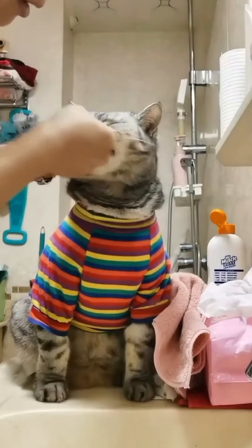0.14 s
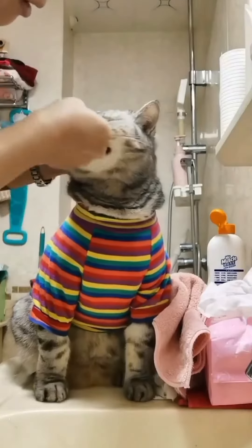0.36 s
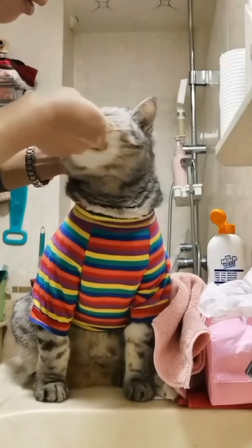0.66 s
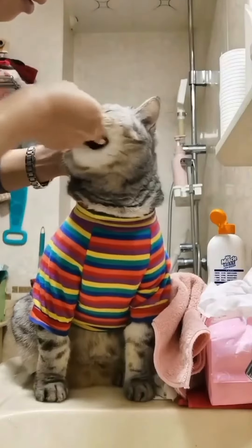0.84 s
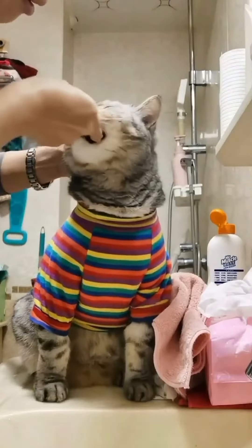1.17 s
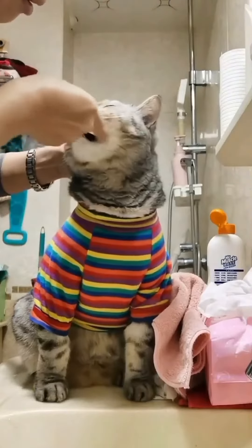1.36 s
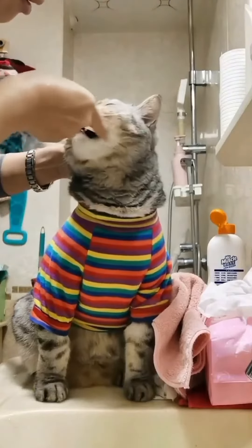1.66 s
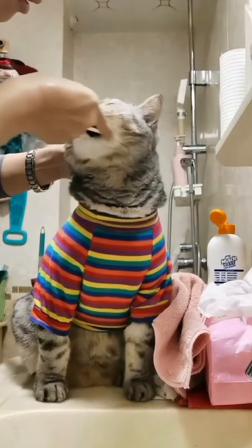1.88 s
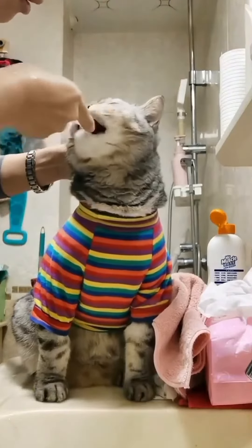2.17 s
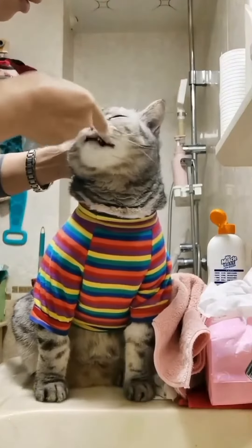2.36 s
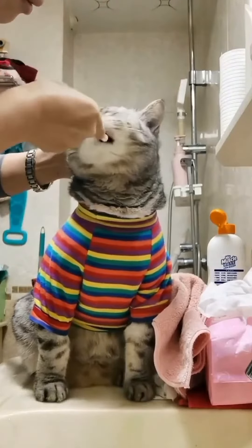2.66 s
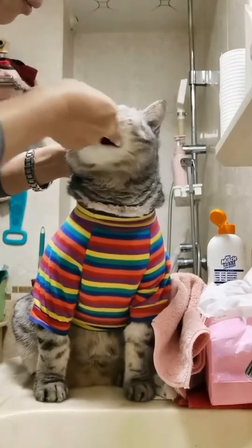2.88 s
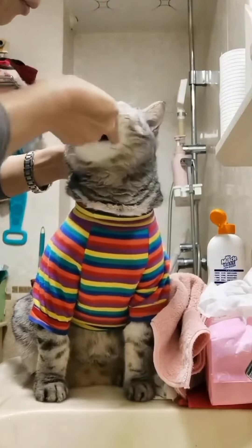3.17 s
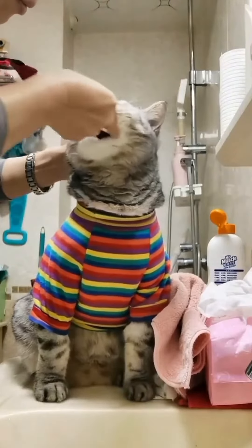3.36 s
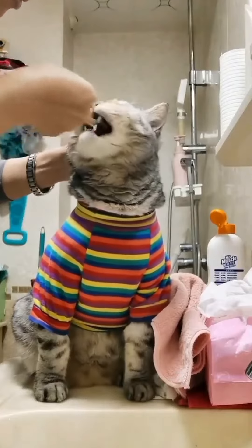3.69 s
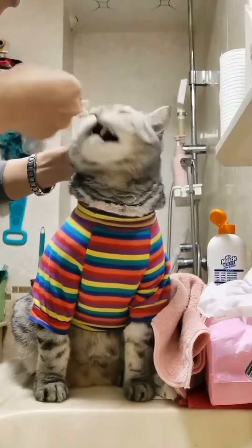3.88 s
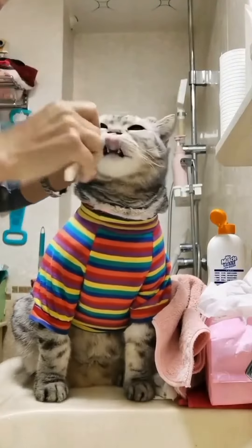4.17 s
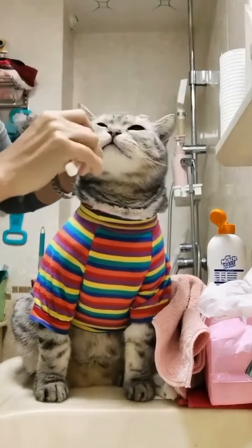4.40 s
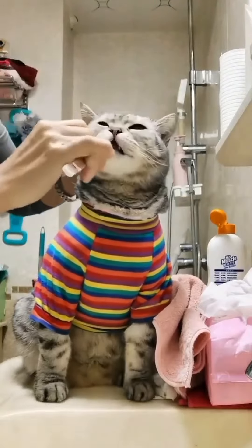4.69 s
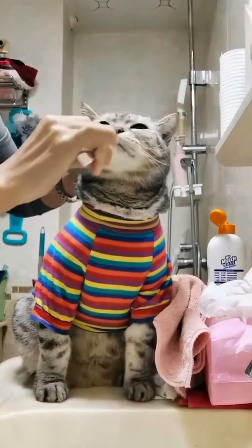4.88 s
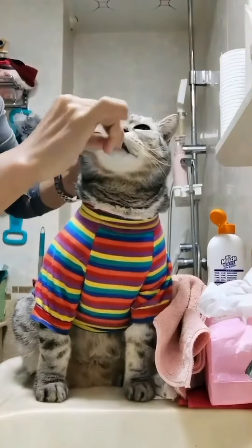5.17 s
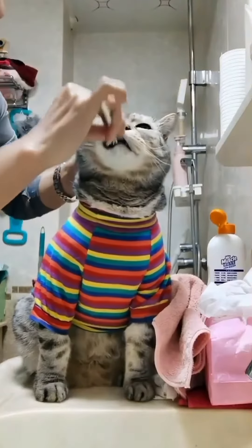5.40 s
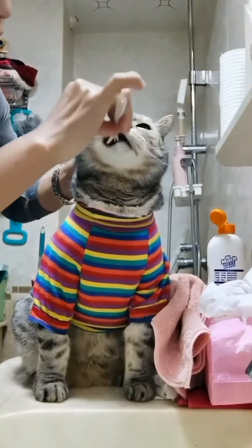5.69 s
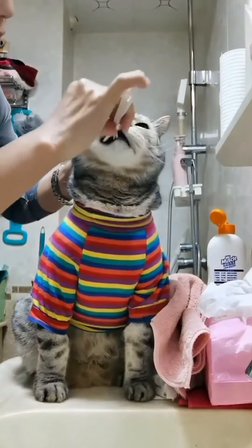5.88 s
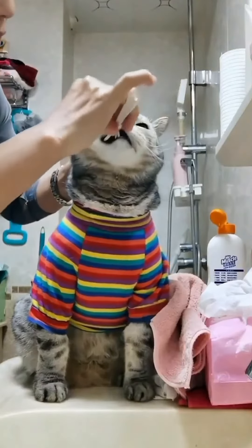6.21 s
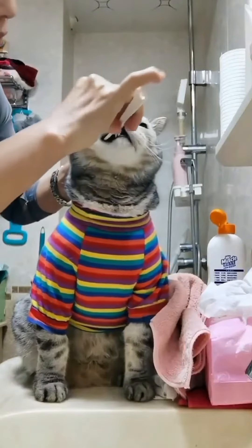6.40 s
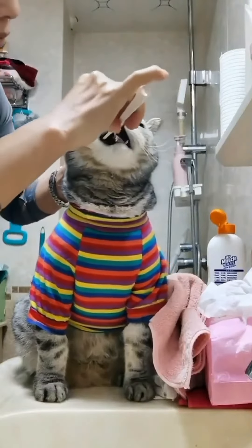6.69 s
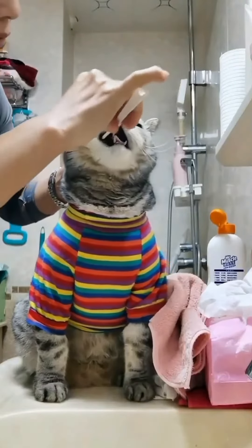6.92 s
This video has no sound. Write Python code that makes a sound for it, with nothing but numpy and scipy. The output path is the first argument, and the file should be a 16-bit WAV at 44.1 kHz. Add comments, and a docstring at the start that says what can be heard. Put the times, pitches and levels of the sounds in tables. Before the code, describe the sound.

Quick scratchy toothbrush strokes in three bursts with sharp hollow clicks, in a small tiled bathroom over faint low hum, ending with soft bumps and rustling.

```python
"""Brush strokes over a cat's teeth, in a small tiled bathroom, close to a phone: quick bursts of bristle flicks ring
the mouth cavity. Now and then a tuft snaps off a tooth, with a crack, a ring, bursting saliva and sometimes a spit.
Fur and sleeves rustle as filtered grains, and the restless cat bumps softly as decaying low sines with padding.
Reflections from the tiles follow; beneath lie a wavering sine hum, a faint drone and filtered room noise."""
import sys
import numpy as np
from scipy import signal
from scipy.fft import rfft, irfft, next_fast_len
from scipy.io import wavfile
from scipy.ndimage import uniform_filter1d

SR = 44100
rng = np.random.default_rng(int(sys.argv[2]) if len(sys.argv) > 2 else 0)


def put_to_file(sound):
    """Save the sound as 16-bit audio at rate SR, in the file named by the first command-line argument."""
    columns = np.atleast_2d(sound).T  # one column per channel
    safe = np.clip(columns, -1, 1)
    whole_steps = np.round(safe * 32767)
    wavfile.write(sys.argv[1], SR, whole_steps.astype(np.int16))


N = 310905
TIME = np.arange(N) / SR


def undb(db):
    """Decibels to gain."""
    return 10 ** (np.asarray(db) / 20)


def unit(x):
    """Scale to rms 1."""
    return x / np.sqrt(np.mean(x ** 2) + 1e-18)


def add(out, start_s, x):
    """Mix x into out from start_s on."""
    first = max(int(start_s * SR), 0)
    out[first:first + len(x)] += x[:max(N - first, 0)]


def colour(x, points):
    """Shape the spectrum with a causal, minimum-phase filter through (frequency [Hz], gain [dB]) points."""
    size = next_fast_len(len(x) + 8192) // 2 * 2
    hz, db = np.transpose(points)
    bin_hz = np.arange(size // 2 + 1) * SR / size
    log_gain = np.log(undb(np.interp(np.log(bin_hz + 1), np.log(hz), db)))
    # folding the cepstrum forward in time makes the filter causal
    cepstrum = irfft(log_gain)
    cepstrum[1:size // 2] *= 2
    cepstrum[size // 2 + 1:] = 0
    return irfft(rfft(x, size) * np.exp(rfft(cepstrum)))[:len(x)]


def resonate(x, hz, width_hz):
    """One resonance, gain 1 at its centre."""
    return signal.lfilter(*signal.iirpeak(hz, hz / width_hz, SR), x)


def cavity(x, hz, width_hz):
    """A steep-sided resonance at rms 1, from two peaks in series."""
    return unit(resonate(resonate(x, hz, width_hz), hz, 2 * width_hz))


def sine(hz, t):
    """A steady tone starting at phase 0."""
    return np.sin(2 * np.pi * hz * t)


def fade(t, t60):
    """Exponential decay, 60 dB down after t60 seconds."""
    return np.exp(-np.log(1000) * t / t60)


def walk(rate):
    """Smooth random wander at rms 1, with rate [Hz] new targets a second."""
    step = int(SR / rate)
    targets = rng.standard_normal(N // step + 2)
    path = np.interp(np.arange(N) / step, np.arange(len(targets)), targets)
    return unit(uniform_filter1d(path, step // 2))


def flicks(per_s, spread_db):
    """Random tiny impulses of uneven size, at rms 1 together."""
    size = rng.choice([-1, 1], N) * undb(spread_db * np.clip(rng.standard_normal(N), -2, 2))
    return unit(size * (rng.random(N) < per_s / SR))


# brush strokes over the teeth: (start [s], length [s], stroke level before trims [dB],
# mouth ring relative level before trim [dB], sizzle relative level [dB],
# lowest mouth resonance before its slide [Hz], second [Hz], third [Hz])
STROKE_TABLE = [(0.035, 0.063, -45, -2, -1, 2345, 4650, 5200),
                (0.186, 0.065, -46.5, 2.5, 2.5, 2225, 4080, 6800),
                (0.302, 0.072, -51.5, -1, -4, 2160, 4030, 7600),
                (0.416, 0.042, -49, 3, 0, 2240, 4960, 5970),
                (0.497, 0.055, -51.5, 5, -4.5, 2200, 4800, 6600),
                (0.618, 0.022, -55.5, 10.5, 12.5, 2120, 3100, 6570),
                (0.72, 0.062, -46.5, -2.5, -4, 2210, 4200, 6230),
                (2.144, 0.069, -55.5, 0.5, 5.5, 2150, 4970, 5440),
                (2.243, 0.086, -54.5, -1, -3.5, 1930, 4630, 6550),
                (2.333, 0.067, -49.0, 4.5, 5, 2180, 4520, 6870),
                (2.42, 0.077, -51, 0, 2.5, 2300, 3890, 5490), (2.506, 0.055, -47.5, 0, 2, 2380, 3550, 5360),
                (2.575, 0.062, -47.5, -3, 0, 2480, 4060, 5310),
                (2.643, 0.068, -48.5, -6, -1, 2400, 4200, 6240),
                (2.744, 0.029, -41.5, -3.5, 1.5, 2420, 3530, 6500),
                (2.807, 0.036, -36.5, -7, -2, 2650, 4620, 5300),
                (2.883, 0.049, -42, -4.5, 0.5, 2310, 3150, 6400),
                (2.958, 0.037, -41, -2.5, -0.5, 2430, 3600, 5360),
                (3.038, 0.045, -43.5, 1.5, -1, 2340, 3070, 6370),
                (3.109, 0.043, -45.5, -3.5, 2, 2440, 3550, 6230),
                (3.183, 0.047, -41, -0.5, -1.5, 2440, 5090, 5200),
                (3.25, 0.046, -41, -7, -2.5, 2580, 3800, 5310),
                (3.322, 0.057, -45.5, -1.5, -2, 2280, 3690, 6300),
                (3.388, 0.048, -39.0, -3, -8.5, 2190, 4460, 5600),
                (3.463, 0.031, -43.5, -5, 0, 2200, 4000, 5760),
                (3.515, 0.075, -51, 1.0, 6.5, 2140, 3750, 5350),
                (3.602, 0.066, -40.5, -1, -0.5, 2216, 4800, 5500),
                (4.359, 0.07, -44.5, -11, -1.5, 2260, 4180, 6200),
                (4.49, 0.033, -40.5, -1.5, 0.5, 2520, 4070, 6300),
                (4.538, 0.068, -47.5, -2.5, 0.5, 2394, 3730, 6150),
                (4.632, 0.047, -42.5, -1.5, 3.5, 2470, 3070, 6460),
                (4.704, 0.04, -43, -11, -0.5, 2340, 4340, 6300),
                (4.771, 0.094, -56.5, -30, 8.5, 2100, 5000, 5370),
                (4.944, 0.026, -50.5, -10.5, -3, 2530, 4650, 6050),
                (5.025, 0.027, -45, -17, -4, 2480, 4260, 6400),
                (5.078, 0.051, -48, -21, 0, 2330, 4000, 6680),
                (5.18, 0.039, -43, -10, 0.5, 2440, 4450, 6700),
                (5.246, 0.048, -42.5, -8.5, 1, 2340, 3550, 5800),
                (5.356, 0.055, -49.5, -4.5, 5, 2320, 3810, 6600),
                (5.431, 0.053, -56.5, 1, 3, 2270, 3820, 5850),
                (5.514, 0.04, -38.5, -10, -3.5, 2220, 3800, 5770),
                (5.581, 0.047, -37.5, -5.5, -7.5, 2330, 4180, 6260),
                (5.676, 0.028, -36.0, -2, -1.5, 2230, 3950, 6650),
                (5.73, 0.074, -42.5, -4.5, -3, 2336, 4900, 5800)]
# bristle scratch, spectrum: (frequency [Hz], gain [dB])
SCRATCH_SPECTRUM = [(1800, -25.5), (2080, -21.5), (2400, -12), (2800, 4), (3500, 6.5), (4500, 8),
                    (5100, -9.5), (6500, -40)]
# bristle sizzle, spectrum: (frequency [Hz], gain [dB])
SIZZLE_SPECTRUM = [(3500, -33.5), (4700, -6.5), (5200, 0), (5800, -2.5), (6500, -2.5), (7400, -4.5),
                   (8000, -13), (8700, -25), (9500, -40.5)]
# mouth colour over time: (time [s], dull gum scrape level [dB], depth of the hollow above the mouth resonance [0-1])
MOUTH_COLOUR = [(.06, -69, 0.07), (.22, -54.5, 0), (.45, -64, 0.4), (2.2, -69.5, 0), (2.35, -66, .1),
                (2.6, -67, 0), (3.25, -64.5, 0), (3.6, -59.5, 0.8), (4.4, -58.5, 0), (4.9, -69, 0.36),
                (5.27, -64, .8), (5.75, -60.5, 0.53)]
# brush on the gums, spectrum: (frequency [Hz], gain [dB])
GUM_SPECTRUM = [(700, -19), (1200, 3.5), (1700, 2.5), (2400, -8), (4000, -43)]
LEAD_S = 0.0033  # a stroke starts bright and ends hollow: sizzle this much early, mouth ring this much late
SLIDE_PER_S = 1  # largest share per second by which the lowest resonance slides as the brush pushes the lip
HOLLOW_RATIO = 1.225  # the mouth swallows a band at this multiple of its lowest resonance


def brushing(mouth_width_hz=270, upper_width_hz=900, hollow_width_hz=450, scratch_db=0.5, sizzle_db=-2.0,
             mouth_db=3.0, second_db=-6, third_db=-6, grit_db=-8, gums_db=0.0):
    """Strokes drag bristles over the teeth; they flick free and ring the mouth, and some catch harder and click."""
    bristles = flicks(per_s=3000, spread_db=2.0) * undb(1.94 * walk(150))
    wet = shifting(bristles, patchy_db=3.8, rate=30)
    ringing = narrow_resonances(wet)
    scratch = colour(ringing, SCRATCH_SPECTRUM)
    sizzle = colour(ringing, SIZZLE_SPECTRUM)
    grit = unit(colour(flicks(per_s=190, spread_db=1.5), CRACK_SPECTRUM))
    gums = unit(colour(bristles, GUM_SPECTRUM))
    times, gum_levels, depths = np.transpose(MOUTH_COLOUR)
    out = np.zeros(N)
    for start, length, db, ring_db, bright_db, mouth_hz, second_hz, third_hz in STROKE_TABLE:
        span = slice(max(int((start - .06) * SR), 0), int((start + length + .08) * SR))
        t, push = TIME[span] - start, bristles[span]
        early, speed, late = (drag(t + lead, length) for lead in (LEAD_S, 0, -LEAD_S))

        low = undb(mouth_db) * cavity(push * late, mouth_hz, mouth_width_hz)
        low = slide(low, t - length / 2, SLIDE_PER_S * rng.uniform(-1, 1))
        middle = undb(scratch_db) * unit(scratch[span] * speed)
        middle += undb(second_db) * cavity(wet[span] * speed, second_hz, upper_width_hz)
        high = undb(sizzle_db) * unit(sizzle[span] * early)
        high += undb(third_db) * cavity(push * early, third_hz, upper_width_hz)

        stroke = glance(undb(ring_db) * low + middle + undb(bright_db) * high, echo_db=-6)
        stroke *= np.sqrt(np.mean(speed ** 2))
        stroke += undb(grit_db) * grit[span] * speed
        depth = np.clip(np.interp(start, times, depths), 0, 1)
        stroke -= depth * resonate(stroke, HOLLOW_RATIO * mouth_hz, hollow_width_hz)
        # the mouth radiates little below its lowest resonance
        edge = signal.butter(12, .87 * mouth_hz, "high", fs=SR, output="sos")
        out[span] += undb(db) * signal.sosfilt(edge, stroke)
        scrape_db = gums_db + np.interp(start, times, gum_levels)
        out[span] += undb(scrape_db) * gums[span] * speed
    return out


STROKE_RISE_S, STROKE_FALL_S = 0.019, 0.049


def drag(t, length):
    """Brush speed in one stroke: it speeds up, slides, and slows to turn round."""
    rise = 1 + np.tanh(t / STROKE_RISE_S)
    fall = 1 - np.tanh(2 * (t - length) / STROKE_FALL_S)
    arch_db = -2 * np.minimum((2 * t / length - 1) ** 2, 2) - 0.6
    return rise * fall / 4 * undb(arch_db)


def shifting(x, patchy_db, rate):
    """Lips and wet bristles keep changing shape, so each narrow band swells and fades on its own."""
    edges = np.arange(900, 9500, 300)  # Hz
    out = np.zeros(N)
    for k, pair in enumerate(zip(edges, edges[1:])):
        band = signal.sosfilt(signal.butter(2, pair, "band", fs=SR, output="sos"), x)
        out += (-1) ** k * band * undb(patchy_db * walk(rate))
    return out


def slide(x, t, per_s):
    """Move all pitches of x steadily up or down by warping time around t = 0."""
    return np.interp(t * (1 + per_s * t / 2), t, x)


# fixed narrow resonances, as close reflections colour the noise: (frequency [Hz], width [Hz], level [dB])
NARROW_MODES = [(3150, 160, -7), (3690, 110, -8), (3870, 90, -10), (4410, 130, -4), (5200, 160, -5),
                (5820, 100, -8), (6520, 150, -3)]


def narrow_resonances(x):
    """Close reflections add fixed narrow resonances."""
    return x + sum(undb(db) * resonate(x, hz, width_hz) for hz, width_hz, db in NARROW_MODES)


def glance(x, echo_db, span_s=.009):
    """Lips, fingers and brush handle throw back eight very short echoes, drawn anew each time, at equal rms."""
    out = x.copy()
    for lag, size in rng.uniform(-1, 1, size=(8, 2)):
        delay = 1 + int(abs(lag) * span_s * SR)
        out[delay:] += undb(echo_db) * size * x[:-delay]
    return out * np.sqrt(np.mean(x ** 2) / np.mean(out ** 2))


# tufts snapping off a tooth, also setting off the saliva; the rows from 6.45 s on are ticks of the hands in fur
# and cloth, played alike: (time [s], mouth ring level before trim [dB], # crack level before trim [dB], mouth
# resonance [Hz], lower tick resonance [Hz], upper tick resonance [Hz])
SNAP_TABLE = [(0.019, -49, -46.5, 2390, 4740, 5640), (0.033, -48, -44, 2570, 4400, 5160),
              (.286, -24.5, -44.5, 2410, 4740, 7100), (.295, -22.5, -54, 2370, 4530, 6400),
              (.318, -38.5, -48, 2290, 3400, 6100), (.329, -34, -40.5, 2220, 3950, 7800),
              (0.391, -33, -49.5, 2290, 4500, 7400), (0.4, -19, -47, 2260, 4450, 6670),
              (0.499, -22.5, -49.5, 2345, 4370, 6760), (0.505, -22.5, -46.5, 2336, 4300, 6800),
              (0.618, -21.5, -39.5, 2360, 4500, 6050), (.636, -30, -50, 2330, 2950, 6540),
              (.644, -41, -60, 2280, 3970, 5030), (0.666, -42, -54.5, 2320, 4000, 7200),
              (0.684, -34, -46.5, 2330, 4750, 6330), (0.694, -30, -45.5, 2440, 3560, 5800),
              (.714, -21, -37, 2400, 3040, 4440), (0.726, -37, -40, 2390, 3580, 6500),
              (1.819, -64, -57.5, 1920, 4280, 7200), (2.331, -43, -50, 1950, 3000, 6850),
              (2.369, -35, -48, 2150, 3300, 6800), (2.744, -40, -42.5, 2310, 3480, 5440),
              (2.887, -30.5, -43, 2300, 3140, 6600), (3.396, -27, -34.5, 2140, 4400, 5650),
              (3.411, -27, -44.5, 2260, 3670, 6300), (3.476, -36, -38, 2390, 4040, 5740),
              (3.532, -32, -35, 2270, 4220, 5870), (3.559, -18, -31.5, 2300, 3700, 6700),
              (3.6, -17.5, -47, 2290, 4400, 7600), (3.641, -29, -36.5, 2420, 5320, 7250),
              (4.488, -26, -42.5, 2890, 4170, 6300), (4.811, -51, -43.5, 2430, 4300, 6300),
              (5.086, -41, -43.5, 2430, 3960, 6660), (5.373, -45, -49, 2330, 3600, 6500),
              (5.52, -41, -41, 2250, 5900, 6860), (5.537, -32.5, -41.5, 2270, 3850, 5000),
              (5.614, -29, -44, 2310, 4200, 6400), (5.674, -31, -39.5, 2260, 3170, 6400),
              (6.45, -53, -49.5, 2410, 4860, 7640), (6.474, -50, -44.5, 2490, 4540, 7000),
              (6.531, -37, -57, 2040, 3100, 6700), (6.654, -55, -48, 2640, 3840, 6600),
              (6.958, -42, -44, 2580, 3650, 6800), (6.972, -36.5, -47, 1850, 3420, 6940),
              (6.994, -41, -45.5, 1950, 3500, 7300)]
# tuft crack, also the grit in the strokes, spectrum: (frequency [Hz], gain [dB])
CRACK_SPECTRUM = [(600, -16.5), (1400, -3), (2200, 3), (3000, -13), (4200, -0.5), (7200, 3.5), (8400, -13),
                  (11000, -26.5)]
# time constants of a tuft that bends, lets go and slips off
BEND_S, RELEASE_S, SLIP_S = 0.005, 0.0006, 0.0026


def snaps(ring_t60=0.015, ring_db=3.5, crack_db=-1, attack_s=0.001212, tuft_db=-2, tuft_t60=0.012,
          drag_db=-18, after_db=-15, after_t60=0.073):
    """A bent tuft drags, then slips off a tooth, or a hand catches on cloth: crack, two ticking tones, mouth
    ring and faint brush after-ring."""
    out, t = np.zeros(N), TIME[:SR // 10]
    onset = (1 - np.exp(-t / attack_s)) ** 2
    sharp = 1 - np.exp(-t / RELEASE_S)
    lead = t[:SR // 50]
    bend = np.exp((lead - lead[-1]) / BEND_S)
    for s, mouth_db, tick_db, hz, low_hz, high_hz in SNAP_TABLE:
        burst = rng.standard_normal(len(t)) * np.exp(-t / SLIP_S)
        tuft = (sine(low_hz, t) + sine(high_hz, t)) * fade(t, tuft_t60)
        crack = unit(colour(glance(narrow_resonances(burst * sharp), echo_db=-3, span_s=.002), CRACK_SPECTRUM))
        crack += undb(tuft_db) * unit(tuft * sharp)
        crack /= np.sqrt(np.mean(crack[:SR // 200] ** 2))  # rms 1 over the first 5 ms
        after = sum(sine(f, t) for f in rng.uniform(2800, 7800, size=5))
        after = after * fade(t, after_t60) * onset / 2
        ring = sine(hz, t) * fade(t, ring_t60) * onset
        add(out, s - attack_s, undb(mouth_db + ring_db) * ring)
        add(out, s - RELEASE_S, undb(tick_db + crack_db) * (crack + undb(after_db) * after))
        # the scrape grows while the tuft bends, up to the snap
        rasp = rng.standard_normal(len(lead))
        scrape = undb(mouth_db) * cavity(rasp, hz, 570) / 2
        scrape += undb(tick_db) * cavity(rasp, low_hz, 3000)
        add(out, s - lead[-1], undb(drag_db) * scrape * bend)
    return out


def saliva(crackle_db=-1, spread_db=3, scatter_s=0.018, glide=0.025):
    """After each snap or tick, six tiny films of saliva burst: short ticks that rise in pitch."""
    out, t = np.zeros(N), TIME[:SR // 40]
    ring_t60 = .016
    shape = fade(t, ring_t60) * (1 - np.exp(-t / .0003))
    for s, _, tick_db, *_ in SNAP_TABLE:
        for lag, size, pitch in rng.standard_normal(size=(6, 3)):
            start_hz = 5000 + 2700 * np.tanh(pitch)
            ping = shape * sine(start_hz, t * (1 + glide * t / ring_t60))
            level_db = tick_db + crackle_db + spread_db * np.clip(size, -2, 1)
            add(out, s + scatter_s * abs(lag), ping * undb(level_db))
    return out


# thin spits on the sharpest snaps: (time [s], level before the high-pass [dB])
SPIT_TABLE = [(0.284, -22), (.731, -26.5), (1.82, -42), (3.557, -22), (3.564, -17), (4.811, -28)]


def spits(die_s=0.0018):
    """The sharpest snaps spit a thin tick: a dying noise burst at the very top of the treble."""
    out, t = np.zeros(N), TIME[:SR // 40]
    top = signal.butter(8, 9500, "high", fs=SR, output="sos")
    for s, db in SPIT_TABLE:
        burst = rng.standard_normal(len(t)) * np.exp(-t / die_s)
        add(out, s, undb(db) * signal.sosfilt(top, burst))
    return out


# moves of the hands over fur and sleeves: (peak time [s], swell scale [s], die-away scale [s],
# swish level before trim [dB], rub level before trim [dB], resonance of the cupped hand [Hz])
RUSTLE_TABLE = [(.835, 0.014, 0.021, -61, -46.5, 854), (0.885, 0.037, 0.034, -40.5, -44.5, 1430),
                (1.025, 0.046, 0.041, -45.5, -57, 2300), (1.241, 0.4, 0.39, -59.5, -66, 1205),
                (2.03, .09, 0.15, -65.5, -72.5, 2000), (3.99, 0.017, 0.032, -64, -76, 1500),
                (4.156, 0.023, 0.026, -62.5, -61.5, 1330), (4.25, 0.042, 0.27, -63, -71.5, 1980),
                (4.88, 0.019, 0.038, -57, -85, 1480), (6.23, .2, 0.12, -56, -61, 1144),
                (6.545, 0.052, 0.075, -51.5, -52.5, 1910), (6.654, 0.0096, 0.023, -53, -44, 890),
                (6.685, 0.031, 0.035, -47, -54.5, 1700), (6.715, 0.016, 0.032, -49, -54, 880),
                (6.819, 0.061, 0.053, -52, -68.5, 1500), (7., 0.071, 0.042, -50.5, -66, 1900)]
# hairs swishing, spectrum: (frequency [Hz], gain [dB])
SWISH_SPECTRUM = [(1000, -21.5), (1900, -2.5), (2700, 0), (4200, 0.5), (5000, -5.5), (6800, -2.5),
                  (7600, -5), (8600, -23.5), (9500, -37)]
# cloth rubbing, spectrum: (frequency [Hz], gain [dB])
RUB_SPECTRUM = [(300, -14.5), (550, -11.5), (830, 2.5), (1100, -6), (1450, -2), (1900, -3), (3000, -2),
                (6000, -28)]


def rustle(swish_db=-1, rub_db=1.5, hollow_db=-1, hollow_share=0.4, crinkle_db=-6):
    """Hands shift their grip: hairs swish, cloth rubs and crinkles in the hollow of the hand; each move swells and dies."""
    hairs = shifting(flicks(per_s=3000, spread_db=4), patchy_db=3.5, rate=35)
    swish = unit(colour(hairs, SWISH_SPECTRUM))
    crinkle = undb(crinkle_db) * flicks(per_s=130, spread_db=-0.5)
    cloth = unit(colour(flicks(per_s=2000, spread_db=2.5) + crinkle, RUB_SPECTRUM))
    swish_power, rub = np.zeros(N), np.zeros(N)
    for s, swell_s, die_s, high_db, low_db, hollow_hz in RUSTLE_TABLE:
        distance = np.maximum((s - TIME) / swell_s, (TIME - s) / die_s)
        move = 1 / np.cosh(np.minimum(1.17 * distance, 20))
        swish_power += (move * undb(swish_db + high_db)) ** 2
        grain = np.roll(cloth, rng.integers(N))  # each move gets another stretch of cloth
        grain = grain + undb(hollow_db) * unit(resonate(grain, hollow_hz, hollow_share * hollow_hz))
        rub += move * undb(rub_db + low_db) * unit(glance(grain, echo_db=-8))
    return (swish * np.sqrt(swish_power) + rub) * undb(1.4 * walk(50))


# soft bumps of the cat: (time [s], thud peak level [dB], pitch [Hz], t60 [s], knock and pad level relative to thud [dB])
BUMP_TABLE = [(0.506, -35.5, 108, 0.093, -16), (6.006, -27, 156, 0.13, -8.5),
              (6.477, -32, 150.7, 0.19, -16), (6.512, -30, 104, 0.16, -18), (6.608, -27.5, 131, 0.041, -15),
              (6.757, -24.5, 137, 0.028, -25)]
# modes of the knock: (frequency [Hz], t60 [s], level before halving [dB])
KNOCK_MODES = [(310, 0.17, 4.5), (368, 0.23, -3), (544, 0.058, 1.5), (720, .045, 3), (910, .08, -4.5),
               (1287, 0.055, 1)]
# cloth that pads a bump, spectrum: (frequency [Hz], gain [dB])
PAD_SPECTRUM = [(150, -1), (600, -2), (1400, -10.5), (2200, -33)]


def bumps(attack_s=0.0031, knock_attack_s=0.003, pad_db=-5, pad_t60=0.09):
    """Padded blows: a low thud that builds over milliseconds, with a faint, dull knock and a puff of crushed cloth."""
    out, t = np.zeros(N), TIME[:SR // 2]
    knock = np.zeros(len(t))
    for hz, t60, db in KNOCK_MODES:
        phase = rng.uniform(0, 2 * np.pi)
        knock += undb(db) * np.sin(2 * np.pi * hz * t + phase) * fade(t, t60) / 2
    for s, db, hz, t60, knock_db in BUMP_TABLE:
        swell = fade(t, t60) * (1 - np.exp(-t / attack_s))
        thud = -sine(hz, t) * swell / swell.max()
        puff = unit(colour(rng.standard_normal(len(t)), PAD_SPECTRUM))
        pad = undb(pad_db) * puff * fade(t, pad_t60)
        touch = (knock + pad) * (1 - np.exp(-t / knock_attack_s))
        add(out, s, undb(db) * (thud + undb(knock_db) * touch))
    return out


def bathroom(x, tail_db=-13, early_db=-13, early_t60=0.084):
    """Close tiled walls: sparse quick reflections and a longer, bright tail, as decaying noise convolved with x."""
    t = TIME[:SR * 3 // 4]
    sparse = rng.random(len(t)) < .02
    early = rng.standard_normal(len(t)) * sparse * fade(t, early_t60) * (t > .002)
    tail = rng.standard_normal(len(t)) * fade(t, t60=.52) * (t > .008)
    response = (undb(early_db) * unit(early) + undb(tail_db) * unit(tail)) / np.sqrt(len(t))
    return x + signal.fftconvolve(x, response)[:N]


# low hum: (time [s], level before trim and waver [dB])
HUM_LEVEL = [(0, -49), (.33, -81), (.53, -49.5), (0.749, -64), (1.02, -44.5), (1.65, -66), (1.838, -43),
             (2.351, -37.5), (2.75, -39.5), (2.9, -49.5), (3.48, -47), (3.6, -62), (4.05, -45),
             (4.38, -40.5), (4.6, -52), (5.25, -58), (6.4, -54), (6.58, -48.5), (7.05, -43.5)]
# low room rumble: (time [s], level before trim [dB])
RUMBLE_LEVEL = [(.85, -53.5), (1.0, -47), (1.22, -51.5), (2.1, -49), (3.0, -51), (6.4, -49.5), (6.6, -45),
                (7.05, -50)]
# room rumble, spectrum: (frequency [Hz], gain [dB])
RUMBLE_SPECTRUM = [(20, -7), (45, -9.5), (62, -0.5), (85, 1), (110, -3), (155, 0.5), (200, -1.5), (250, 0),
                   (310, -12.5), (420, -16), (700, -22), (1500, -52.5)]
# room hiss, spectrum: (frequency [Hz], gain [dB])
AIR_SPECTRUM = [(150, -27.5), (500, 11), (640, -6), (820, 8.5), (1050, 1), (1600, 1), (2500, -4),
                (4500, -14.5), (7000, -7.5), (8500, -52)]
HUM_HZ = 74.96  # centre of the wavering pitch


def background(hum_db=-2.0, rumble_db=2.0, air_db=-64, drone_db=-61, drone_hz=243):
    """A hum wavering in pitch and level and a faint drone of narrow noise, over dull rumble and a trace of hiss."""
    phase = 2 * np.pi * np.cumsum(HUM_HZ * (1 + 0.02894 * walk(12))) / SR
    hum_level = np.interp(TIME, *np.transpose(HUM_LEVEL)) + hum_db + 2.1 * walk(15)
    hum = np.sqrt(2) * np.sin(phase) * undb(hum_level)
    drone = undb(drone_db) * cavity(rng.standard_normal(N), drone_hz, 17.3)
    rumble_level = np.interp(TIME, *np.transpose(RUMBLE_LEVEL)) + rumble_db
    rumble = unit(colour(rng.standard_normal(N), RUMBLE_SPECTRUM)) * undb(rumble_level)
    air = unit(colour(rng.standard_normal(N), AIR_SPECTRUM)) * undb(air_db + 1.2 * walk(4.1))
    return hum + drone + rumble + air


def scene():
    """Brush, cat and hands ring the room; spits and background stay without reflections."""
    close = brushing() + snaps() + saliva() + rustle() + bumps()
    return (bathroom(close) + spits() + background())[None]


TREBLE_HZ, TOP_HZ = 8650, 15800


def record(dry):
    """The phone drops the treble steeply by some 30 dB above TREBLE_HZ and cuts off at TOP_HZ."""
    dull = signal.sosfilt(signal.ellip(8, .2, 30, TREBLE_HZ, fs=SR, output="sos"), dry)
    return signal.sosfilt(signal.ellip(10, .2, 70, TOP_HZ, fs=SR, output="sos"), dull)


dry = scene()
out = record(dry)
put_to_file(out)
```